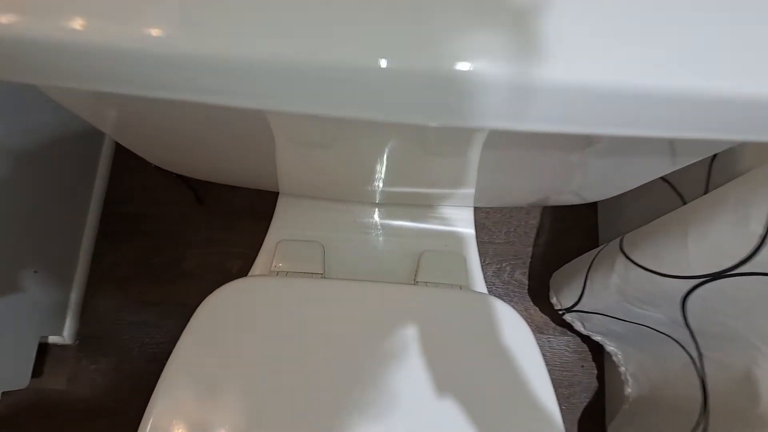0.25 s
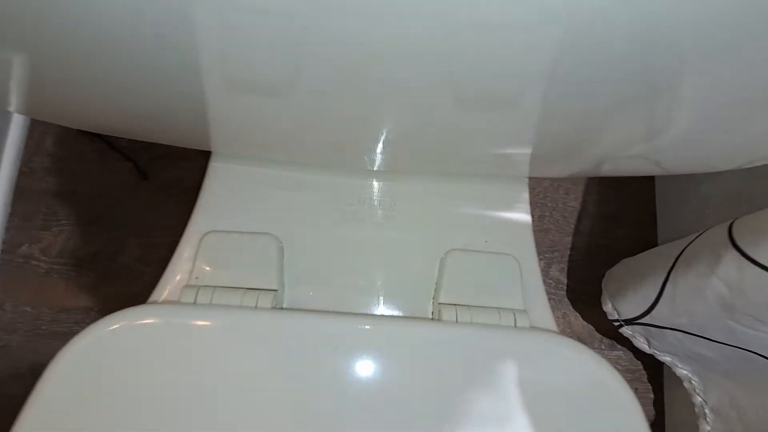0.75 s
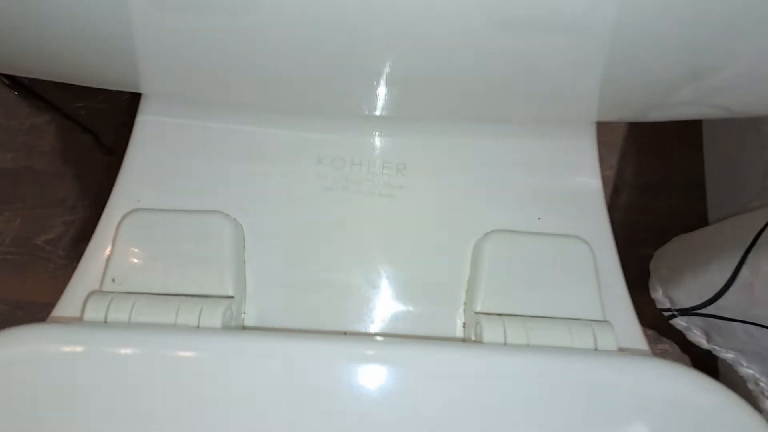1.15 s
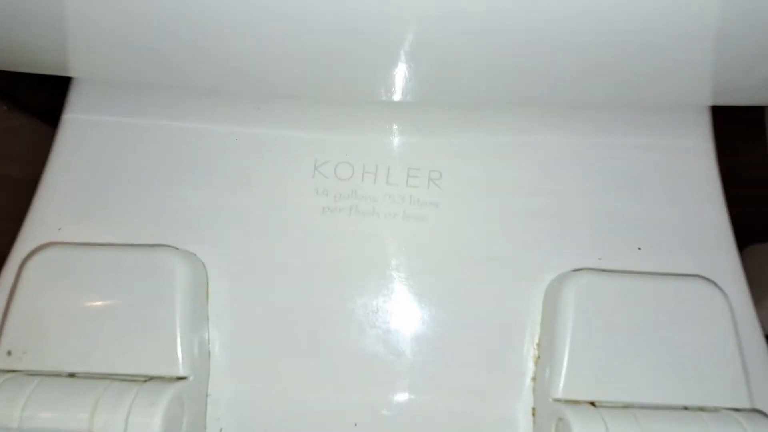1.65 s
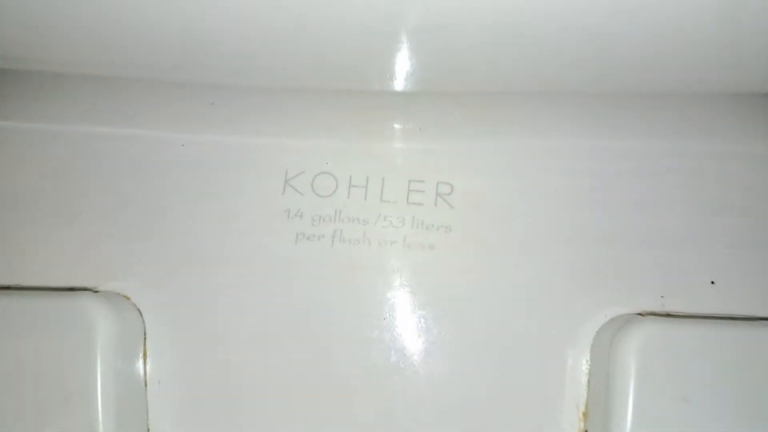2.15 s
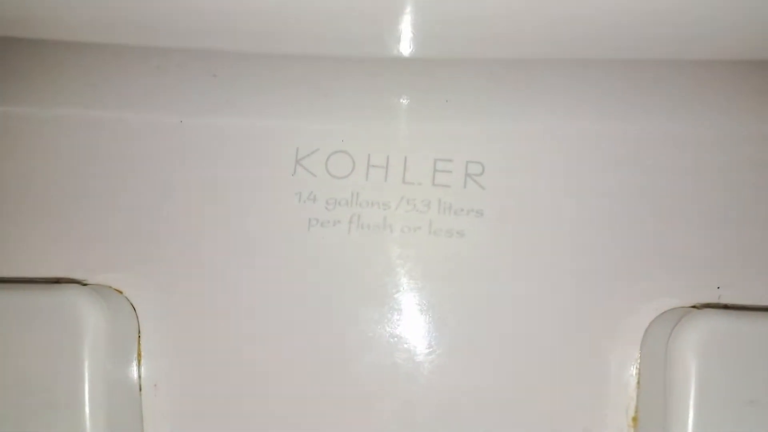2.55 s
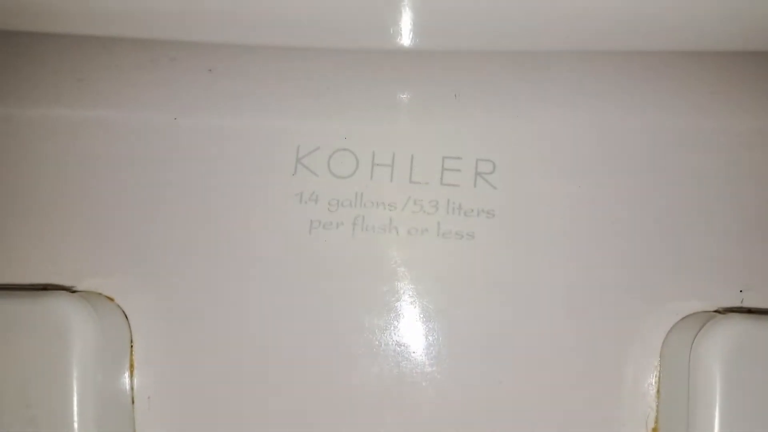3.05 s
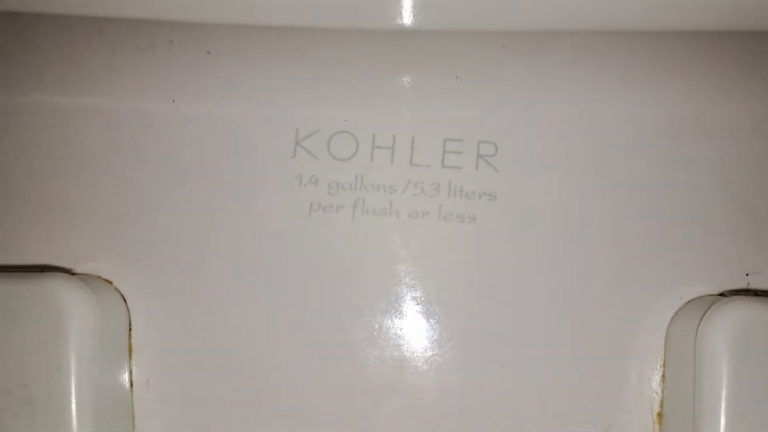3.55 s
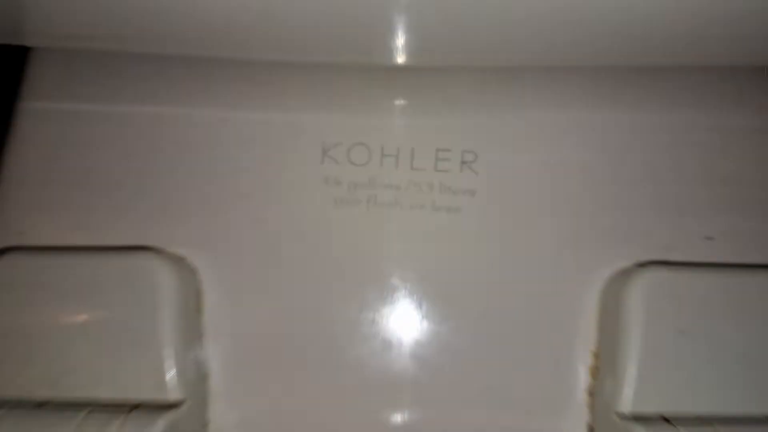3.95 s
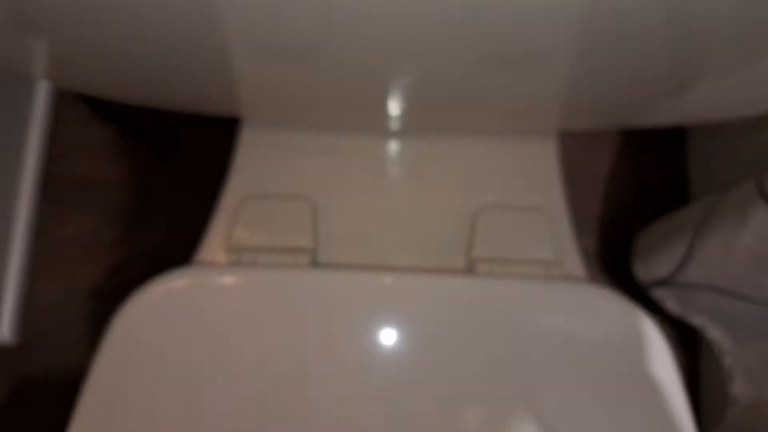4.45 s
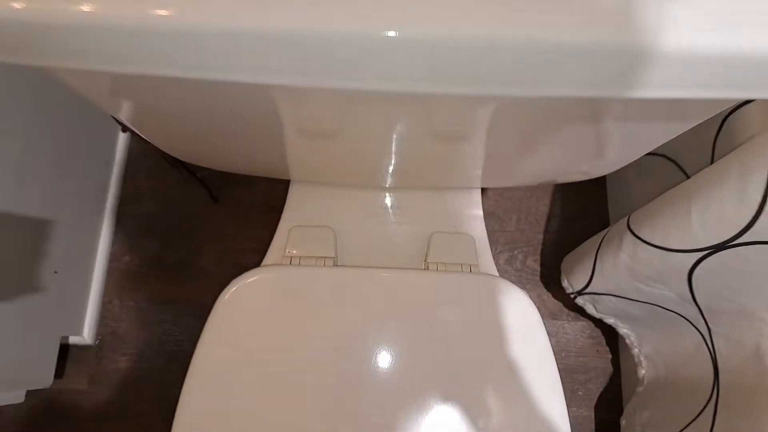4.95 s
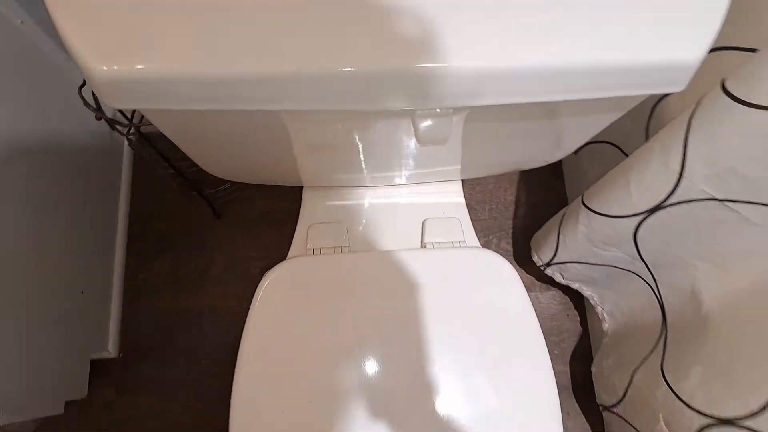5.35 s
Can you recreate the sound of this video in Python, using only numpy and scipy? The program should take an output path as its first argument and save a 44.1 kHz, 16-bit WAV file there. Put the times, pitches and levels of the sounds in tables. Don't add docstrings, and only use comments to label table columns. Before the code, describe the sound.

A close handheld microphone picks up a bassy, pulsing ventilation hum. Early on comes one very loud plastic clap against porcelain, with a brief bright crack and short room tail. Afterwards, quiet cloth friction brushes past twice, with a faint low tap on the tank, followed by a short scrape and soft low bumps as the lid settles. Only the fan remains.

```python
import sys
import numpy as np
from scipy import signal
from scipy.fft import rfft, irfft, next_fast_len
from scipy.io import wavfile
from scipy.ndimage import uniform_filter1d

SR = 44100
rng = np.random.default_rng(int(sys.argv[2]) if len(sys.argv) > 2 else 0)


def transcribe(u):
    v = np.clip(np.atleast_2d(u).T, -1, 1)
    q = np.round(v * 32767).astype(np.int16)
    wavfile.write(sys.argv[1], SR, q)


def field_ratio(decibels):
    return 10 ** (np.asarray(decibels, dtype=float) / 20)


N = 247842
TIME = np.arange(N) / SR
LEFT_RIGHT = np.array([[1], [-1]])

# f/Hz, likeness [-1..1]
PORT_LIKENESS = [(60, 0.91), (130, 0.87), (290, 0.79), (640, 0.56), (1410, -0.22), (3100, 0.0018),
                 (6820, 0.029), (15000, 0.0094)]
# f/Hz, left minus right level/dB
PORT_LEAN = [(60, -1.5), (110, 0.5), (200, -2), (380, -1), (700, -1), (1290, -6), (2380, -17), (4400, -6),
             (8120, 2), (15000, -9)]
# f/Hz, left minus right level/dB
CLAP_PORT_LEAN = [(60, -1.5), (110, 2), (200, 0), (380, -1), (700, 3.5), (1290, -10), (2380, 12),
                  (4400, -6.5), (8120, 1.0), (15000, -3.5)]
# t/s, level/dB
WALL_GAIN = [(0, -1), (1.2, 2), (1.7, 4.5), (2.2, 1.5), (2.55, 5), (3.3, 6.5), (3.9, 7.5), (4.3, 4),
             (4.75, 3.5), (5.2, 0), (5.62, 1)]

# f/Hz, density/dB
RUMBLE_SPECTRUM = [(7.1, -47.5), (12, 1.5), (30, -5), (38, -11), (52, -3), (65, 14), (86, -11), (140, -4),
                   (180, -44), (310, -120)]
# f/Hz, width/Hz, level/dB
ROOM_RESONANCES = [(71.6, 8, 6.5), (118.7, 14, 1), (178.9, 27, -64)]
# f/Hz, width/Hz, level/dB
UPPER_RESONANCES = [(219, 11, -73.5), (248.8, 13, -67.5), (280.7, 14, -68.5), (321.7, 12.2, -67.5),
                    (345.4, 9.2, -73)]
# t/s, level/dB
LOW_SURGES = [(0.0, 17.5), (.392, 14.5), (.688, 14.5), (.9, 8), (1.098, 13.5), (1.33, 9), (1.7, 3.5),
              (1.92, -5), (2.09, 3), (2.55, 8.5), (2.76, 6), (2.93, 8), (3.09, 11), (3.3, 7), (3.57, 4.5),
              (3.68, 10), (3.87, 16.5), (4.03, 12.5), (4.13, 15.5), (4.23, 10), (4.35, 10), (4.45, 6),
              (4.6, 11), (4.7, 8), (5.146, 3), (5.28, 10.5), (5.4, 6)]
# t/s, level/dB
HIGH_SURGES = [(0.0, 13.5), (.1, 8), (.688, 5.5), (1.0, -2), (1.16, 2.5), (1.99, 5.5), (2.1, 9.5),
               (2.74, 3.5), (3.2, 5), (3.42, 5), (3.77, 5.5), (3.88, 2), (3.98, -1.5), (4.39, 6.5),
               (4.75, 3), (5.28, 3), (5.38, 8.5), (5.58, 7)]
# f/Hz, density/dB
MURMUR_SPECTRUM = [(82, -24.5), (140, 6), (151, -49.5), (173, -5), (210, -14), (238, 0), (269, -3),
                   (327, -3.5), (365, -6), (502, -4.5), (547, -10), (649, -15.5), (900, -22), (1170, -50),
                   (1980, -120)]
# t/s, level/dB
HISS_LEVEL = [(0, -75), (.45, -72), (.9, -72), (1.03, -80.5), (1.15, -73), (1.3, -78.5), (1.4, -71),
              (1.64, -79), (1.7, -76), (1.9, -77), (5.1, -77), (5.2, -73.5), (5.5, -73)]
# f/Hz, density/dB
HISS_BODY = [(410, -27), (700, -14), (741, -7), (779, -23), (903, -23.5), (1010, -1), (1210, -2.5),
             (1340, 6), (1550, -10.5), (1800, 0.5), (2040, -7), (2950, -6), (5000, -23.5), (6500, -54),
             (11000, -120)]
# f/Hz, density/dB
HISS_TOP = [(2650, -45), (4500, -25), (5370, -14.5), (5870, -13), (7570, -6.5), (8990, -13), (9980, -9.5),
            (12500, 0.5), (15600, -18.5)]

# t/s, level/dB
CLOTH_PRESSURE = [(1.7, -101), (2.0, -75.5), (2.12, -76), (2.33, -60.5), (2.57, -53.5), (2.68, -60),
                  (2.79, -53), (2.93, -56.5), (3.18, -58.5), (3.33, -70.5), (3.43, -67), (3.54, -55),
                  (3.84, -58.5), (4.03, -52.5), (4.27, -58), (4.61, -55), (4.72, -61), (4.79, -69.5)]
# f/Hz, density/dB
RUB_BODY = [(350, -47), (600, -4.5), (641, -4), (856, -8), (1210, -5), (1320, -1), (1600, -5.5),
            (1760, -4.5), (2650, -2), (4040, -4.5), (5600, -16), (7280, -57), (12300, -120)]
# f/Hz, density/dB
RUB_TOP = [(3290, -17), (5600, -8), (7280, -2), (9330, -11), (12000, 0), (13900, -9), (15600, -18.5)]
# f/Hz, density/dB
SHOVE_SPECTRUM = [(12, -35), (20, 3), (80, -4), (119, -11), (151, -15), (189, -4.5), (232, -39),
                  (270, -17.5), (350, -9.5), (401, -21), (444, -13), (492, -20.5), (694, -37), (769, -25),
                  (1200, -28.5), (1560, -66), (2640, -120)]
# f/Hz, density/dB
SCRAPE_SPECTRUM = [(350, -24), (600, 6), (697, -2), (772, -3), (1150, -2), (1400, 6.5), (1530, -1.5),
                   (2700, 2), (5600, -15.5), (7280, -53), (12300, -120)]

# t/s, level/dB, contact cut-off f/Hz
KNOCK_CONTACTS = [
    (3.7693, -31, 900),
    (3.7950, -37.5, 900),
    (3.991, -44, 800),
]
# f/Hz, level/dB, t60/s
TANK_MODES = [(245, -17, 0.04), (354, 3.5, 0.046), (411, -2, 0.19), (454, -19.5, .12), (660, -25, 0.041)]
# t/s, level/dB, contact cut-off f/Hz
SETTLE_CONTACTS = [
    (4.8070, -31.5, 600),
    (4.827, -51, 300),
    (4.8560, -27, 600),
    (4.891, -52, 500),
    (4.929, -43, 700),
    (5.018, -42.5, 300),
    (5.061, -50, 400),
]
# f/Hz, level/dB, t60/s
SEAT_MODES = [(35, -5, 0.25), (72, -10, .2), (121.5, 1.5, 0.39), (179, -1, 0.079), (335, -5.5, 0.16),
              (448, -4.5, 0.17)]
# t/s, level/dB, contact cut-off f/Hz
REBOUND_CONTACTS = [
    (1.604, -43, 800),
    (1.700, -49, 700),
    (1.7093, -49, 700),
]
# f/Hz, level/dB, t60/s
REBOUND_MODES = [(445, -3, .12), (553, 0, .17), (590, -8, .15), (810, -10, .15), (925, -14, .2)]

# t/s, level/dB, contact cut-off f/Hz
CLAP_CONTACTS = [
    (1.4226, -0.5, 900),
    (1.4236, -3.5, 3020),
    (1.428, -11, 4020),
    (1.4288, -1.5, 3500),
    (1.431, -34, 1495),
    (1.4402, -20, 1495),
    (1.447, -18, 1500),
    (1.4670, -12, 800),
    (1.604, -33, 1000),
]
# f/Hz, level/dB, t60/s
LID_MODES = [(327, -15.5, 0.08), (455, -16.5, 0.083), (608, -13.5, 0.1), (1279, -18, 0.086),
             (1660, -24, 0.021), (1987, -11, 0.071), (2175, -14, 0.039), (2480, -20, 0.057),
             (3270, -26, 0.012), (2960, -8.5, 0.011), (3810, -33, .02)]
# f/Hz, level/dB, t60/s, sign at the microphone
BODY_MODES = [(66, -21, .16, 1), (123, -11, .33, -1), (136, -16, .1, -1), (189.9, -10.2, .34, 1),
              (195, -11, .31, -1), (201, -4.5, .15, 1), (226, -15, .2, 1), (241, -17, .3, -1),
              (250, -19, .4, -1), (280.5, -26, .36, -1), (318, -19, .2, 1), (328, -16, .38, 1),
              (345, -16, .36, 1), (404.5, -29, .3, 1), (446, -26, .4, -1), (452, -16, .08, 1),
              (473, -22, .24, -1), (503.5, -25, .3, 1), (550.8, -13.5, .36, 1), (556.9, -14.5, .24, 1),
              (562.7, -23, .52, -1), (577.3, -12, .18, 1), (602.6, -17, .23, -1), (673, -36, .4, 1),
              (798, -21, .13, 1), (921, -30.5, .4, -1), (1034, -26, .22, 1), (1109, -34, .22, -1),
              (1179, -33, .28, 1), (1432, -30, .13, -1)]
# f/Hz, density/dB
WASH_SPECTRUM = [(450, -26), (700, -7.5), (1000, -6.5), (1400, -9.5), (2000, -8), (3000, -16.5),
                 (4000, -22), (5500, -38), (8000, -40.5), (12000, -46), (15000, -53.5)]
# f/Hz, t60/s
WASH_T60 = [(600, .42), (1500, .33), (3000, .24), (6000, .2), (15000, .15)]
WASH_EDGES_HZ = 500 * 2 ** np.arange(0, 5.1, 1 / 3)

MOTOR_HZ, MOTOR_DB = 27.5, -57.5
RUMBLE_DB, LOW_DB, HIGH_DB, MURMUR_DB = -57.5, -59, -56, -60.5
MOTOR_FOLLOWS, RUMBLE_FOLLOWS, LOW_FOLLOWS, HIGH_FOLLOWS = 0.3, 0.6, 0.72, 0.84
SURGE_S = 0.039
EVEN_S, EVEN_FLOOR = 0.013, 0.27
HISS_BODY_DB, HISS_BODY_FOLLOWS = -63, 0.2
RUB_BODY_DB, RUB_BODY_FOLLOWS, RUB_TOP_DB = -51, 0.68, -0.27
SHOVE_S, SHOVE_ATTACK_S = 4.8, 0.0099
# level dB, hold s, release dB/s
SHOVE_LOW, SHOVE_BODY, SHOVE_TOP = (-35.5, 0.083, 75), (-44.5, 0.093, 84), (-58, 0.067, 85)
CLAP_START = round(CLAP_CONTACTS[0][0] * SR)


def rms_one(x):
    return x / np.sqrt(np.mean(x ** 2) + 1e-20)


def in_time(rows):
    s, level_db = np.transpose(rows)
    return np.interp(TIME, s, level_db)


def at_hz(points, hz):
    table_hz, values = np.transpose(points)
    return np.interp(np.log(hz), np.log(table_hz), values)


def port_gain(hz, lean=PORT_LEAN):
    return field_ratio(at_hz(lean, hz) / 2 * LEFT_RIGHT)


def drift(rate_hz):
    r = np.exp(-80 * np.pi * rate_hz / SR)
    chance = rng.standard_normal(N // 40 + 2002)
    slow = signal.lfilter([1], [1, -2 * r, r * r], chance)[2000:]
    return np.interp(np.arange(N) / 40, np.arange(len(slow)), rms_one(slow))


def coloured(spectrum):
    size = next_fast_len(N)
    hz = np.maximum(np.arange(size // 2 + 1) * SR / size, 1)
    mid, side = rfft(rng.standard_normal((2, size)))
    alike = np.clip(at_hz(PORT_LIKENESS, hz), -1, 1)
    pair = np.sqrt(1 + alike) * mid + np.sqrt(1 - alike) * side * LEFT_RIGHT
    shaped = irfft(pair * field_ratio(at_hz(spectrum, hz)) * port_gain(hz), size)[:, :N]
    return shaped / np.sqrt(np.mean(shaped.mean(axis=0) ** 2))


def humming(tones):
    out = []
    for hz, width_hz, db in tones:
        r = np.exp(-np.pi * width_hz / SR)
        section = [1, 0, -1, 1, -2 * r * np.cos(2 * np.pi * hz / SR), r * r]
        noise = rng.standard_normal((2, N))
        mid, side = rms_one(signal.sosfilt([section, section], noise))
        out.append(field_ratio(db) * port_gain(hz) * (mid + 0.15 * side * LEFT_RIGHT))
    return out


def evened(x):
    power = uniform_filter1d(x.mean(axis=0) ** 2, size=round(EVEN_S * SR))
    return x / (EVEN_FLOOR + np.sqrt(power + 1e-12))


def surges(rows):
    return np.max([db * np.exp(-0.5 * ((TIME - s) / SURGE_S) ** 2) for s, db in rows], axis=0)


def fan_rumble():
    wall_db = in_time(WALL_GAIN)
    low, high, third = humming(ROOM_RESONANCES)
    low_db = LOW_DB + LOW_FOLLOWS * wall_db + surges(LOW_SURGES)
    high_db = HIGH_DB + HIGH_FOLLOWS * wall_db + surges(HIGH_SURGES)
    out = field_ratio(MOTOR_DB + MOTOR_FOLLOWS * wall_db) * np.sin(2 * np.pi * MOTOR_HZ * TIME)
    out = out + field_ratio(RUMBLE_DB + RUMBLE_FOLLOWS * wall_db) * coloured(RUMBLE_SPECTRUM)
    out += field_ratio(low_db) * evened(low)
    out += field_ratio(high_db) * evened(high)
    return out + third


def room_murmur():
    murmur = field_ratio(MURMUR_DB) * coloured(MURMUR_SPECTRUM)
    return field_ratio(in_time(WALL_GAIN)) * (murmur + sum(humming(UPPER_RESONANCES)))


def fan_hiss():
    top_db = in_time(HISS_LEVEL)
    body_db = HISS_BODY_DB + HISS_BODY_FOLLOWS * (top_db + 72)
    return field_ratio(body_db) * coloured(HISS_BODY) + field_ratio(top_db) * coloured(HISS_TOP)


def shove(level_db, hold_s, release_db_per_s):
    since = TIME - SHOVE_S
    fall_db = release_db_per_s * np.maximum(since - hold_s, 0)
    return np.clip(since / SHOVE_ATTACK_S, 0, 1) * field_ratio(level_db - fall_db)


def cloth_and_shove():
    press_db = in_time(CLOTH_PRESSURE)
    touch = np.clip((TIME - CLOTH_PRESSURE[0][0]) / 0.05, 0, 1) * (TIME < SHOVE_S)
    flicker = field_ratio(0.45 * drift(15))
    body_db = RUB_BODY_DB + RUB_BODY_FOLLOWS * (press_db + 57.5)
    friction = touch * field_ratio(body_db) * coloured(RUB_BODY)
    friction += shove(*SHOVE_BODY) * coloured(SCRAPE_SPECTRUM)
    friction += (touch * field_ratio(RUB_TOP_DB + press_db) + shove(*SHOVE_TOP)) * coloured(RUB_TOP)
    return flicker * friction + shove(*SHOVE_LOW) * coloured(SHOVE_SPECTRUM)


def struck(modes, blows, level_db, spread_db, blunt_hz):
    out = np.zeros((2, N))
    luck = rng.standard_normal((len(blows), len(modes), 2))
    start = int(blows[0][0] * SR) - 9
    for m, (hz, db, t60) in enumerate(modes):
        clicks = np.full((2, N - start), 1e-18)
        for (s, blow_db, cut_hz), (common, odd) in zip(blows, luck[:, m]):
            unlike = np.clip(hz / 2500, 0, 1) * odd * np.array([1, -1])
            soft = 1 / (1 + (hz / cut_hz) ** 2)
            strength = soft * field_ratio(blow_db + db + spread_db * common)
            clicks[:, round(s * SR) - start] += strength * (1 + unlike)
        r, w = field_ratio(-60 / (t60 * SR)), 2 * np.pi * hz / SR
        ring = signal.lfilter([0, np.sin(w)], [1, -2 * r * np.cos(w), r * r], clicks)
        out[:, start:] += port_gain(hz) * ring
    blunt = signal.butter(3, [modes[0][0] / 3, blunt_hz], "band", fs=SR, output="sos")
    return field_ratio(level_db) * signal.sosfilt(blunt, out)


def small_contacts():
    out = struck(TANK_MODES, KNOCK_CONTACTS, level_db=-4, spread_db=3.0, blunt_hz=900)
    out += struck(SEAT_MODES, SETTLE_CONTACTS, level_db=-2.5, spread_db=2.5, blunt_hz=545)
    out += struck(REBOUND_MODES, REBOUND_CONTACTS, level_db=0, spread_db=0, blunt_hz=900)
    return out


def clap_wash(level_db):
    out = np.zeros((2, N))
    since = TIME[:SR // 2]
    noise = coloured(WASH_SPECTRUM)[:, :SR // 2]
    crack = 1 + 2.5 * np.exp(-since / 0.0045)
    attack = np.clip(since / 0.0031, 0, 1) ** 2
    for low, high in zip(WASH_EDGES_HZ, WASH_EDGES_HZ[1:]):
        band = signal.sosfilt(signal.butter(2, [low, high], "band", fs=SR, output="sos"), noise)
        fall = field_ratio(-60 * since / at_hz(WASH_T60, np.sqrt(low * high)))
        out[:, CLAP_START:CLAP_START + SR // 2] += band * fall * crack * attack
    return field_ratio(level_db) * out


def clap_body(swell_s, lag_s):
    out = np.zeros((2, N))
    since = np.maximum(TIME[:SR] - np.array([[0], [lag_s]]), 0)
    for hz, db, t60, sign in BODY_MODES:
        swell = 1 - np.exp(-since / swell_s * max(hz / 200, 0.8) ** 2)
        level = port_gain(hz, CLAP_PORT_LEAN) * field_ratio(db - 60 * since / t60)
        out[:, CLAP_START:CLAP_START + SR] += sign * swell * level * np.sin(2 * np.pi * hz * since)
    return out


def lid_clap():
    out = clap_body(swell_s=0.014, lag_s=0.00024)
    out += struck(LID_MODES, CLAP_CONTACTS, level_db=-12.0, spread_db=4, blunt_hz=4010)
    return out + clap_wash(level_db=-20.5)


def scene():
    background = fan_rumble() + room_murmur() + fan_hiss()
    return background + cloth_and_shove() - small_contacts() + lid_clap()


def top_cut(x):
    return signal.sosfilt(signal.butter(12, 15770, fs=SR, output="sos"), x)


def record(dry):
    mix = 1.274 * np.tanh(dry / 1.175)
    return top_cut(mix)


dry = scene()
out = record(dry)
transcribe(out)
```